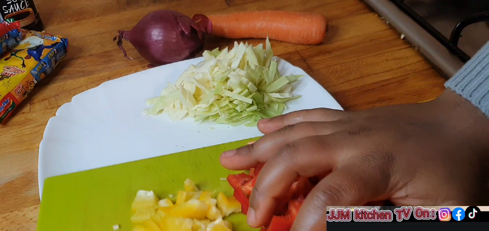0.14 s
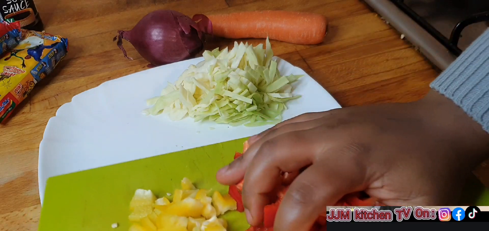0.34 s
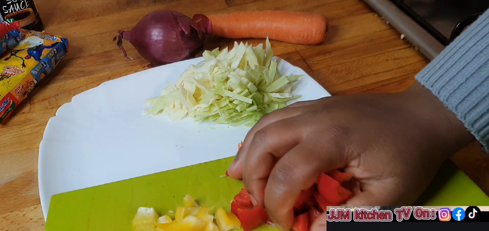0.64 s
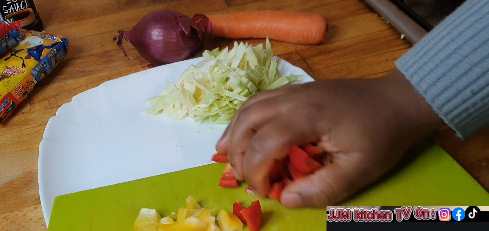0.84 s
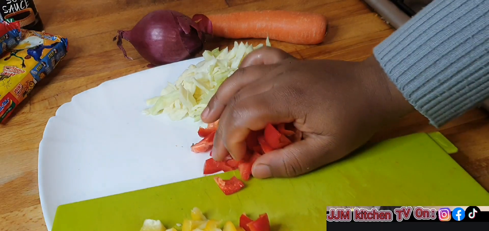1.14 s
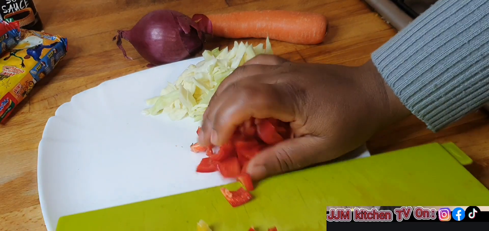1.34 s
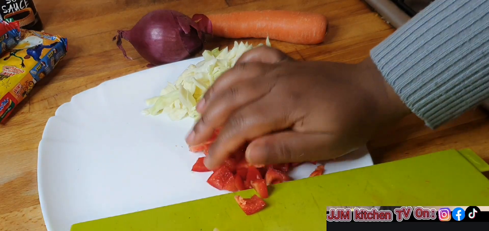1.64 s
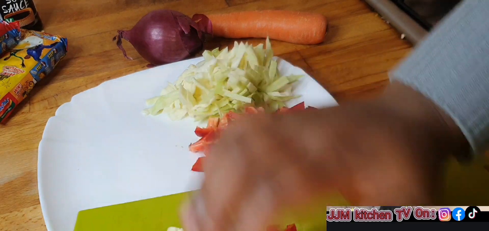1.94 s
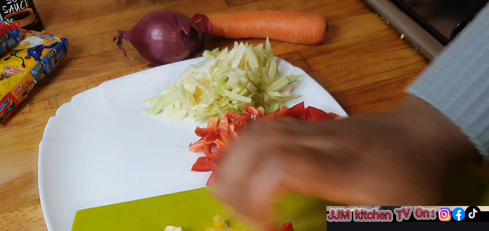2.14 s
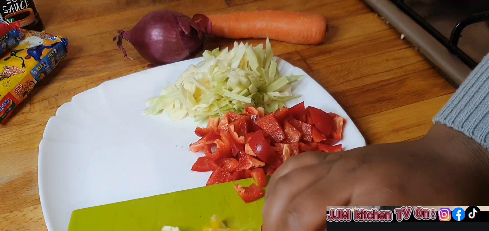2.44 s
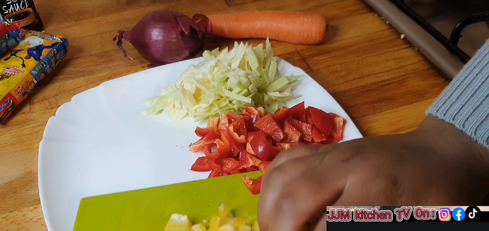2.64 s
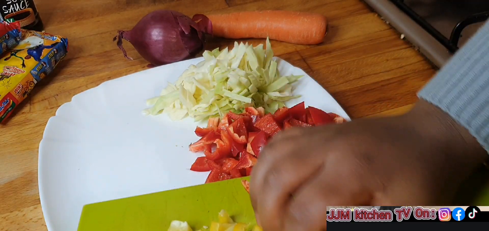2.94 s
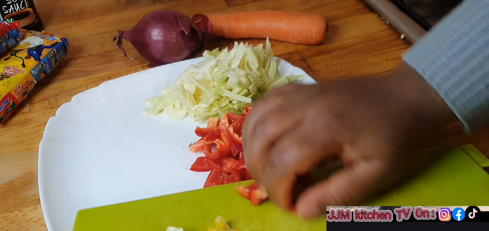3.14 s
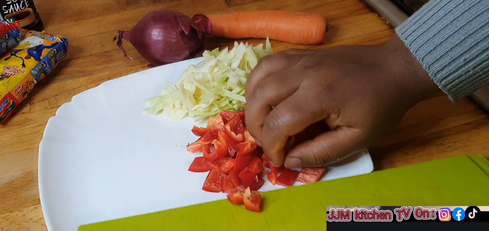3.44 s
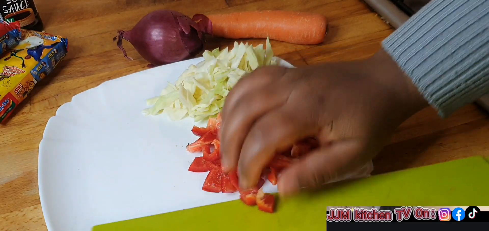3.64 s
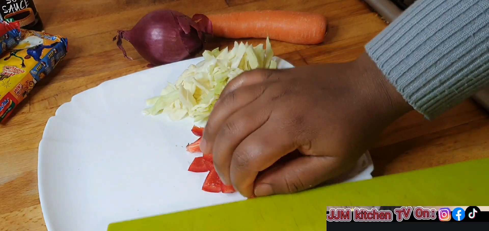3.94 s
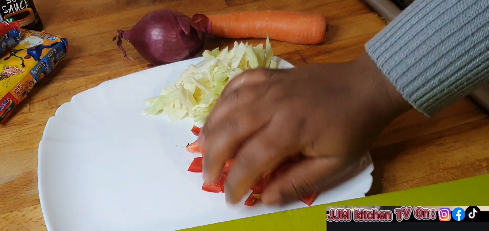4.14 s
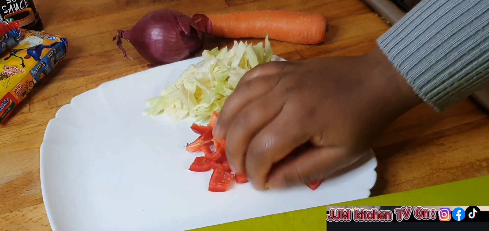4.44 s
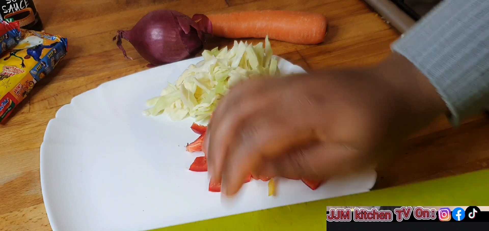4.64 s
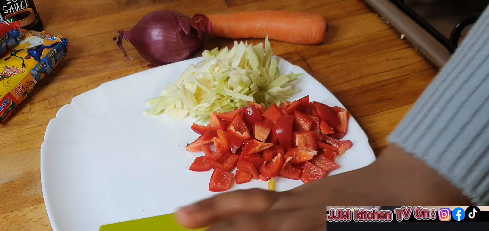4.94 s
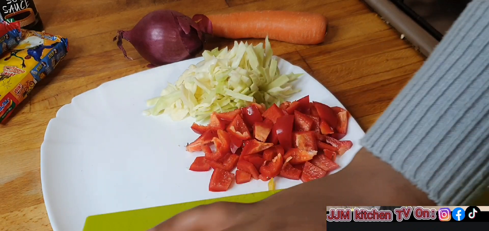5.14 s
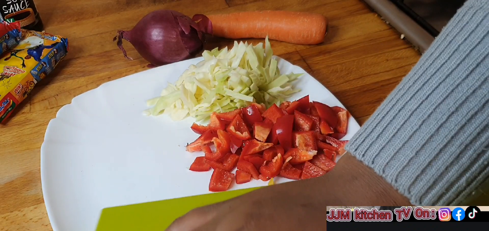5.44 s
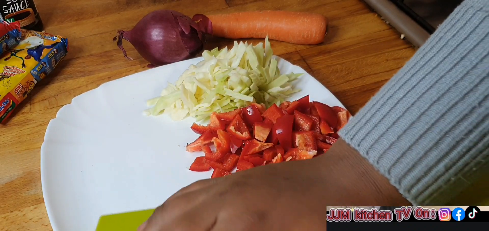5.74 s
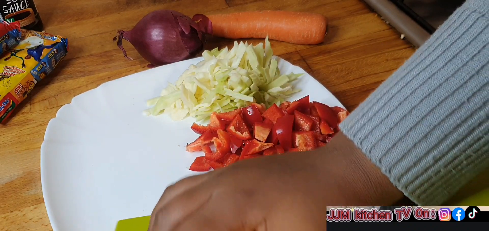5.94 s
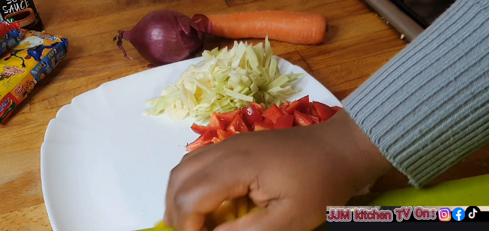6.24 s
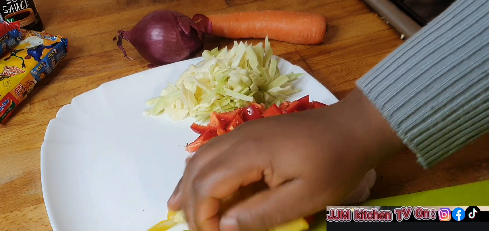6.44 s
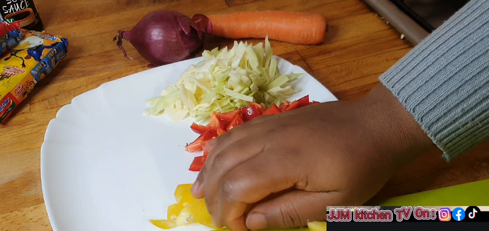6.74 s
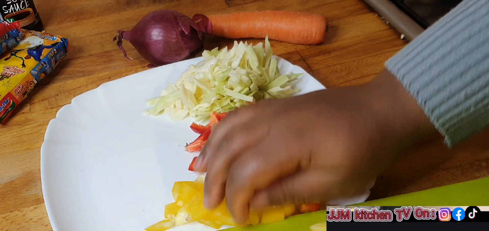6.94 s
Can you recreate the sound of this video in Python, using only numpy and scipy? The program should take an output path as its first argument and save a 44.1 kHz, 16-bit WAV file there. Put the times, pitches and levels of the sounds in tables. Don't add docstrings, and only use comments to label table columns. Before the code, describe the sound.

In a quiet small kitchen, a hand pushes chopped peppers from a plastic board onto a china plate. A sharp clack of board on rim comes early, with dry rubbing strokes, then softer taps, faint squeaks and deep worktop thumps. Near five seconds a hard double knock rattles the plate, followed by stronger scraping and rumble. Close stereo microphone, slightly left, picking up bumps through the wood.

```python
import sys
import numpy as np
from scipy import signal
from scipy.io import wavfile
from scipy.ndimage import uniform_filter1d

SR = 44100
rng = np.random.default_rng(int(sys.argv[2]) if len(sys.argv) > 2 else 0)


def natural_amplitude(level_db):
    exponent = np.asarray(level_db, float) / 20
    return 10 ** exponent


def inscribe(sig):
    pcm = np.round(np.clip(np.atleast_2d(sig).T, -1, 1) * 32767)
    wavfile.write(sys.argv[1], SR, pcm.astype(np.int16))


N = 313551
LEFT_DELAY = -2


def evened(x):
    return x / np.sqrt(np.mean(x ** 2) + 1e-20)


def read(points, hz):
    f, value = np.transpose(points)
    return np.interp(np.log(hz + 1), np.log(f + 1), value)


def add(mix, s, sound):
    part = mix[..., round(s * SR):][..., :sound.shape[-1]]
    part += sound[..., :part.shape[-1]]


def band(x, lo_hz, hi_hz):
    return signal.sosfilt(signal.butter(4, [lo_hz, min(hi_hz, SR / 2.2)], "band", fs=SR, output="sos"), x)


def resonate(x, hz, width_hz):
    turn = np.exp(2j * np.pi * np.cumsum(hz * np.ones(x.shape[-1])) / SR)
    r = np.exp(-np.pi * width_hz / SR)
    return 2 * (turn * signal.lfilter([1 - r], [1, -r], x / turn)).real


def pair(x, left_db):
    return np.array([np.roll(x, LEFT_DELAY) * natural_amplitude(left_db / 2), x * natural_amplitude(-left_db / 2)])


def swells(s, hold, db, rise_db_s, fall_db_s, sag_db_s=0):
    t = np.arange(0, N, 64) / SR
    s, end = s[:, None], (s + abs(hold))[:, None]
    climb = rise_db_s * np.maximum(s - t, 0)
    sag = sag_db_s * np.clip(t - s, 0, end - s)
    sink = fall_db_s * np.maximum(t - end, 0)
    return natural_amplitude(db[:, None] - climb - sag - sink)


def per_sample(slow):
    return np.interp(np.arange(N), np.arange(len(slow)) * 64, slow)


# (frequency [Hz], likeness [0-1])
PORT_LIKENESS = [(60, 0.8), (290, 1), (640, 0.26), (1400, 0.035), (3100, 0.13), (7000, 0.054)]


def wash(spectrum, patchy_db, flicker_db):
    frames = (N // 128 + 6) // 2
    hz = np.fft.rfftfreq(1024, 1 / SR)
    a, b, c, d, patches = rng.standard_normal((frames, 513, 5)).T
    patches = evened(uniform_filter1d(uniform_filter1d(patches, 10, 0), 12, 1))
    flicker = evened(uniform_filter1d(rng.standard_normal(frames), size=3))
    same = np.clip(read(PORT_LIKENESS, hz), 0, 1)[:, None]
    left, other = a + 1j * b, c + 1j * d
    delay = np.exp(-2j * np.pi * hz * LEFT_DELAY / SR)[:, None]
    z = np.array([left * delay, same * left + np.sqrt(1 - same ** 2) * other])
    z *= natural_amplitude(read(spectrum, hz)[:, None] + patchy_db * patches + flicker_db * flicker)
    return evened(signal.istft(z, nperseg=1024, noverlap=768)[1][:, :N])


# (frequency [Hz], level [dB], ring t60 [s])
PLATE_MODES = [(960, -12, .05), (1330, -10, .03), (1670, -14, .07), (2010, -14, .06), (2385, -5, .065),
               (2760, -9, .09), (3170, -11, .11), (3460, -14, .09), (4000, -12, .1), (4750, -22, .08)]


def plate(x, spot_db=0):
    t = np.arange(SR // 4) / SR
    hz, db, t60 = np.transpose(PLATE_MODES)[..., None]
    modes = natural_amplitude(db + spot_db - 60 * t / t60) * np.sin(2 * np.pi * hz * t)
    ring = modes.sum(0)
    return signal.oaconvolve(x, ring / np.linalg.norm(ring))[:len(x)]


def lowest_mode(x):
    return 3.2 * resonate(x, 452, 16)


# (frequency [Hz], level [dB])
FLOOR_SPECTRUM = [(18, -39.5), (30, -1.5), (59, -3.5), (120, -14), (225, -21.5), (456, -15.5), (658, -27.5),
                  (3420, -33), (7500, -43.5), (14400, -35), (15600, -47.5)]


def quiet_floor():
    return natural_amplitude(-73.5) * wash(FLOOR_SPECTRUM, 2.2, 0.7)


# (time [s], hold [s], rub [dB], skin hiss [dB], airy top share [dB])
STROKES = [(.01, 0.0056, -83, -85, -6), (0.29, .05, -97, -81, -1.5), (0.482, 0.12, -58.5, -66.5, 1),
           (0.736, 0.14, -54, -65, 2), (0.908, 0.083, -58.5, -72, 5), (1.054, 0.041, -65, -79, 10),
           (1.224, 0.34, -80, -82, -6), (1.64, 0.018, -82, -91, 5), (2.249, 0.025, -88.5, -93, 0.5),
           (2.723, 0.097, -70.5, -79, -3.5), (2.855, 0.18, -75.5, -78.5, 3), (3.088, 0.2, -77.5, -80, 5.5),
           (3.276, 0.031, -72.5, -80, 8), (3.428, 0.018, -72.5, -82, -2), (3.872, 0.24, -82, -83.5, -7.5),
           (4.367, 0.088, -79, -92, 2.5), (4.994, 0.079, -62, -84, -1), (5.2, 0.04, -76, -79.5, -6),
           (5.415, 0.27, -75, -75.5, -7), (5.686, 0.18, -58, -69, -0.5), (5.94, 0.2, -55, -66, 2.5),
           (6.193, 0.084, -61, -72, 4), (6.34, 0.025, -66.5, -78, 5.5), (6.742, 0.06, -82, -85.5, -1),
           (7.098, 0.03, -84, -92, 4.5)]
# (time [s], hold [s], rumble [dB])
SHOVES = [(0.34, 0.46, -67.5), (0.785, 0.039, -56.5), (1.078, 0.012, -63.5), (1.252, 0.3, -75.5),
          (1.6, 0.046, -54), (1.864, 0.037, -70.5), (2.142, 0.13, -64.5), (2.813, 0.1, -62),
          (3.052, 0.025, -69), (3.278, 0.023, -65.5), (3.629, 0.3, -62.5), (4.152, 0.031, -65),
          (4.402, 0.047, -59), (4.694, 0.098, -71.5), (4.953, 0.018, -46.5), (5.263, 0.29, -62.5),
          (5.742, 0.097, -50.5), (6.082, 0.18, -47), (6.398, 0.021, -57.5), (6.595, 0.34, -80.5),
          (7.084, 0.018, -66.5)]
# (frequency [Hz], level [dB])
RUMBLE_SPECTRUM = [(71, -43), (120, 0.5), (161, -2), (204, -0.5), (301, -0.5), (373, -38.5), (445, -8.5),
                   (513, -17), (800, -24.5), (1040, -55.5), (1760, -120)]
# (frequency [Hz], level [dB])
RUB_SPECTRUM = [(290, -34.5), (500, -1.5), (697, -7.5), (953, -2.5), (1020, -5), (1670, -4), (1800, -9),
                (3960, -11.5), (6000, -16.5), (7800, -42), (13200, -120)]
# (frequency [Hz], level [dB])
HISS_SPECTRUM = [(3000, -30), (4500, -6), (6800, -3), (7600, -8), (11000, -9), (14800, -13), (15600, -27)]


def stroke_gain(s, hold, db, rest_db):
    return per_sample(swells(s, hold, db, rise_db_s=121.5, fall_db_s=155.5).max(0)) + natural_amplitude(rest_db)


def sliding():
    s, hold, rub_db, hiss_db, air_db = np.transpose(STROKES)
    rubbing = stroke_gain(s, hold, rub_db, -90.5)
    hissing = stroke_gain(s, hold, hiss_db, -99)
    airing = stroke_gain(s, hold, hiss_db + air_db, -99)
    shoving = swells(*np.transpose(SHOVES), rise_db_s=136, fall_db_s=148).max(0)
    shove = per_sample(shoving) + natural_amplitude(-80.5)

    strength = natural_amplitude(3.5 * np.minimum(rng.exponential(1, N), 4))
    catches = strength * (rng.random(N) < 900 / SR) * rng.choice([-1, 1], N)
    grit = pair(evened(band(catches, 1500, 14000)), 0)
    china = pair(evened(plate(catches)), 0)
    rub = wash(RUB_SPECTRUM, 1.4, .8) + .1 * grit + .2 * china

    rumble = wash(RUMBLE_SPECTRUM, 2.5, 2.5)
    hiss = wash(HISS_SPECTRUM, 2.4, 0.93)
    high = rubbing * rub + hissing * band(hiss, 2000, 7200) + airing * band(hiss, 7200, 17000)
    lean = natural_amplitude(4.5 / 2) ** np.array([[1], [-1]])
    return shove * (rumble + lowest_mode(rumble)) * lean + high * lean


# (time [s], length [s], pitch [Hz], width [Hz], level [dB])
SLIPS = [(.14, .22, 960, 160, -81), (1.53, .18, 4000, 4500, -78), (2.11, .16, 2600, 2500, -81),
         (2.45, .11, 6700, 700, -84), (2.63, .34, 2450, 450, -75), (2.66, .3, 1600, 500, -77),
         (3.0, .27, 1100, 1250, -69), (3.42, .12, 5500, 3000, -79), (1.54, .17, 245, 110, -58),
         (4.01, .09, 4900, 3400, -78), (3.9, .11, 5600, 2600, -82), (4.86, .07, 2400, 300, -74),
         (4.925, .04, 3200, 300, -64), (4.43, .07, 5700, 2000, -77), (4.74, .22, 2400, 400, -83),
         (5.39, .045, 6600, 1500, -76), (5.47, .13, 900, 900, -67), (6.3, .16, 4650, 1000, -71),
         (3.62, .05, 1200, 500, -79), (3.87, .06, 1000, 700, -77), (2.84, .17, 900, 400, -73),
         (3.61, .06, 6000, 2200, -83), (5.72, .1, 800, 200, -60), (6.86, .12, 900, 800, -84),
         (2.42, .1, 950, 300, -82), (.36, .26, 1500, 800, -67), (2.78, .55, 11500, 6000, -81)]
# (time [s], length [s], pitch [Hz], width [Hz], level [dB])
PINGS = [(2.791, .006, 10000, 6000, -60), (4.92, .014, 5800, 1600, -66), (4.961, .018, 8400, 3000, -62),
         (6.103, .016, 6060, 300, -55), (6.103, .016, 7920, 300, -62), (4.962, .08, 7600, 400, -72),
         (.063, .004, 12500, 5000, -79), (.361, .004, 9500, 5000, -73), (1.363, .004, 11500, 7000, -79),
         (1.39, .02, 12000, 6000, -83), (2.26, .004, 12000, 6000, -78), (2.751, .004, 10000, 5000, -70),
         (4.214, .005, 4000, 5000, -75), (4.48, .01, 12000, 4500, -78), (3.883, .005, 11000, 6000, -81),
         (5.397, .005, 7600, 2000, -73), (1.43, .11, 5600, 250, -88), (1.23, .14, 4500, 300, -88)]


def squeaks():
    out = np.zeros((2, N))
    rows = SLIPS + PINGS
    for (s, length, hz, width, db), noise in zip(rows, rng.standard_normal((len(rows), SR))):
        tone = evened(band(noise, hz - width / 2, hz + width / 2)[-round(length * SR):])
        add(out, s, pair(natural_amplitude(db) * tone * signal.windows.tukey(len(tone), .6), 4))
    return out


# (time [s], hold [s], shake [dB], sway pitch [Hz])
THUMPS = [(0.277, 0.038, -67, 57.04), (0.56, 0.12, -49, 60.64), (0.764, 0.21, -63, 62.54),
          (1.051, 0.093, -51, 44.23), (1.555, 0.097, -30.5, 56.36), (1.848, 0.038, -57, 58.34),
          (2.123, 0.1, -33, 54.87), (2.38, 0.021, -63, 56.85), (2.671, 0.11, -29.5, 43.45),
          (2.98, .02, -62, 39.66), (3.12, 0.0093, -62.5, 45.57), (3.269, 0.0066, -48, 46.15),
          (3.374, 0.092, -37, 45.47), (3.581, .01, -50.5, 43.18), (3.896, 0.022, -58.5, 61.07),
          (4.017, 0.049, -36.5, 50.82), (4.218, 0.31, -61, 55.96), (4.638, 0.088, -54, 63.48),
          (4.767, 0.12, -53.5, 78.45), (4.955, 0.024, -45, 78.92), (5.29, 0.049, -40.5, 69.6),
          (5.454, 0.12, -57.5, 56.1), (5.723, 0.069, -29, 67.38), (5.894, 0.052, -46.5, 53.57),
          (6.025, 0.022, -42.5, 58), (6.229, 0.0087, -32.5, 66.1), (6.326, 0.029, -38, 48.75),
          (6.49, 0.29, -57, 51.8), (6.979, 0.11, -47.5, 59.94), (7.083, 0.017, -34, 59.5)]


def shaken_noise(lo_hz, hi_hz):
    return evened(band(rng.standard_normal((2, N)), lo_hz, hi_hz))


def worktop():
    s, hold, db, pitch_hz = np.transpose(THUMPS)
    rise_db_s = 900
    each = swells(s, hold, db, rise_db_s, fall_db_s=209, sag_db_s=41.5) + 1e-9
    hz = per_sample(pitch_hz @ each / each.sum(0))
    shake = per_sample(each.max(0)) + natural_amplitude(-82)
    fresh = per_sample(swells(s, .02 + 0 * s, 0 * s, rise_db_s, 280).max(0))

    turn = 2 * np.pi * np.cumsum(hz) / SR
    drift = uniform_filter1d(uniform_filter1d(rng.standard_normal((2, N)), size=3000), size=3000)
    drift = 0.84 * evened(drift)
    wobble = evened(resonate(resonate(rng.standard_normal((2, N)), 60, 120), 60, 120))
    upper = (0.15 + 0.3 * fresh) * np.sin(1.62 * turn + drift[0])
    lower = 0.66 * np.sin(0.77 * turn + drift[1])
    sway = np.sqrt(2) * (np.sin(turn) + upper + lower) + 0.55 * wobble[0]
    ports = sway * natural_amplitude([[.7], [-.7]]) + 0.38 * wobble[1] * [[1], [-1]]
    ports = shake * natural_amplitude(-3.0) * ports

    rattle = shake * natural_amplitude(-28.5) * shaken_noise(160, 480)
    buzz = shake * natural_amplitude(-42.0) * shaken_noise(420, 1500)
    boom = shake * natural_amplitude([[-22.0], [-18.0]]) * shaken_noise(81, 170)
    return rattle + buzz + boom + band(ports, 28, 92)


# (time [s], peak [dB], thud share [dB], edge share [dB], ring t60 [s])
KNOCKS = [(0.6295, -20, -20, -1, 0.018), (0.661, -35.5, 0.5, -7, 0.15), (0.807, -37.5, -39, -37, 0.1),
          (0.814, -45, -10, -25, 0.028), (0.927, -47, -12, -22, 0.042), (0.960, -44, -9.5, -12, 0.052),
          (1.027, -45.5, -8.5, -17, 0.037), (1.048, -40.5, -30, -7.5, 0.05), (1.066, -42, -36, -24, 0.007),
          (1.1025, -44, -14, -3, 0.03), (1.524, -47, -6, -10, 0.05), (3.26, -37.5, -3, -16, 0.045),
          (3.712, -58, 3, -10, 0.07), (4.456, -43.5, -8, -14, 0.045), (4.923, -35, -6, -10.5, 0.03),
          (4.963, -26.5, -11, 1, 0.022), (5.916, -43, 1, -7, 0.035), (5.984, -47, -13, -8, 0.11),
          (6.048, -49, 5, -3, 0.22), (6.106, -44.5, -6.5, -8, 0.055), (6.169, -50.5, -22, 1, 0.076),
          (6.264, -51.5, -1, -2, 0.073)]
# (time [s], peak [dB], thud share [dB], edge share [dB], ring t60 [s])
BOUNCES = [(0.6321, -33, -33, 8, 0.024), (.636, -36, -15, 5.5, 0.035), (.668, -46, -4, -10, 0.024),
           (3.266, -44.5, 5, -19, .03), (3.271, -44.5, 3, -18, 0.082), (4.929, -45, 10, -13, 0.03),
           (4.967, -34, 2.5, 11, 0.025), (4.971, -38, 2.5, 5.5, 0.021), (4.975, -39, -1, 6.5, 0.037),
           (5.763, -51, 4, -11, 0.034), (6.013, -51, -3, -3, 0.042), (6.234, -54, 7, -3, .03)]
# (time [s], peak [dB], thud share [dB], ring t60 [s])
TAPS = [(1.16, -57.5, -1.5, 0.13), (1.511, -68, 22, 0.068), (1.573, -72, 18, 0.1), (2.128, -64.5, -3, 0.17),
        (2.423, -77, 14, 0.24), (2.997, -63, 0, 0.025), (3.012, -49, -1, 0.035), (3.216, -67, 10, 0.065),
        (3.442, -62.5, 1, 0.049), (3.513, -63, 8, 0.06), (3.851, -73.5, 20, 0.068), (4.015, -52, 11, 0.11),
        (4.253, -58.5, 5.5, 0.12), (4.281, -65.5, 0, 0.066), (4.395, -52.5, -1, 0.055),
        (4.853, -52.5, 3.5, 0.12), (5.277, -66, 0, 0.063), (5.469, -73, 21, 0.25), (5.739, -52, 6, 0.35),
        (6.228, -50, 12, 0.045), (6.818, -77, 16, 0.089), (6.846, -82.5, 18.5, 0.15),
        (7.078, -72, 20, 0.14), (7.097, -51, 4, 0.12)]


def knocks():
    out, t = np.zeros((2, N)), np.arange(SR // 3) / SR
    rim_left_db = 4.5
    ends = signal.windows.tukey(2 * len(t), .5)[len(t):] * (t > 0)
    taps = [(s, db, thud_db, -24, t60) for s, db, thud_db, t60 in TAPS]
    rows = sorted(KNOCKS + taps) + BOUNCES
    rattles = rng.standard_normal((len(rows), 3, len(t)))
    spots = rng.standard_normal((len(rows), len(PLATE_MODES), 1))
    for (s, db, thud_db, edge_db, t60), rattle, spot in zip(rows, rattles, spots):
        t60s = max(t60, .01) * np.array([[.6], [1.4], [1.9]])
        blow = .36 * rattle * (t > 20 / SR) * natural_amplitude(-60 * t / t60s)
        blow[:, 30] += 2.8

        board_hz = (700, 1550) if edge_db < -17 else (720, 2000)
        board = band(blow[0], *board_hz)
        thud = band(blow[1], 190, 620)
        top = .6 * natural_amplitude(min(edge_db, 0)) * band(blow[2], 3900, 6210)
        edge = band(blow[2], 2050, 3500) + top

        bright = board / abs(board).max() + natural_amplitude(edge_db) * edge / abs(edge).max()
        ringing = bright + .1 * plate(bright, 2.5 * spot)
        add(out, s, pair(natural_amplitude(db) * ends * ringing, rim_left_db))

        low = natural_amplitude(db + thud_db) * thud / abs(thud).max()
        rock = 1.1 if db > -40 else .4
        add(out, s, pair(ends * (low + rock * lowest_mode(low)), 0.14 * rim_left_db))
    return out


# (time [s], length [s], level [dB])
DRAGS = [
    (1.2, .14, -84),
    (3.42, .12, -79),
    (3.61, .07, -86),
    (3.72, .08, -86),
    (4.02, .08, -83),
]


def drags():
    out = np.zeros((2, N))
    for (s, length, db), noise in zip(DRAGS, rng.standard_normal((len(DRAGS), SR // 4))):
        rub = band(noise, 3000, 3300) + .6 * band(noise, 3850, 4150)
        song = evened(plate(rub))[:round(length * SR)]
        add(out, s, pair(natural_amplitude(db) * song * np.hanning(len(song)), 4))
    return out


# (frequency [Hz], t60 [s])
KITCHEN_RING = [(200, 0.27), (530, 0.27), (1390, 0.3), (3680, 0.3), (7000, .2)]


def kitchen(x):
    echoes = np.zeros((2, SR // 2))
    at = np.arange(140, SR // 2 - 20, 20)
    at = at + rng.integers(0, 20, (2, len(at)))
    np.put_along_axis(echoes, at, rng.choice([-1., 1.], at.shape), 1)
    hz, t, z = signal.stft(echoes, SR, nperseg=256)
    decay = natural_amplitude(-60 * t / read(KITCHEN_RING, hz)[:, None])
    tail = signal.istft(z * decay, SR, nperseg=256)[1]
    return signal.fftconvolve(x, tail / np.linalg.norm(tail[0]), axes=1)[:, :N]


def scene():
    hits = knocks() + squeaks() + drags()
    return hits + natural_amplitude(-4) * kitchen(hits) + worktop() + sliding() + quiet_floor()


def low_pass(x):
    return signal.sosfilt(signal.butter(12, 15650, fs=SR, output="sos"), x)


def record(dry):
    x = signal.sosfilt(signal.butter(2, 30, "high", fs=SR, output="sos"), dry)
    x = x * np.clip((N - np.arange(N)) / 130, 0, 1)
    return low_pass(x)


dry = scene()
out = record(dry)
inscribe(out)
```